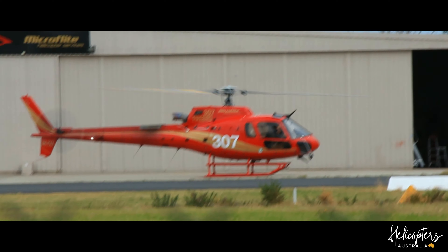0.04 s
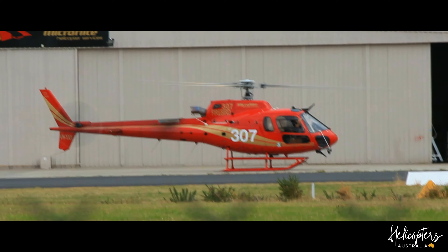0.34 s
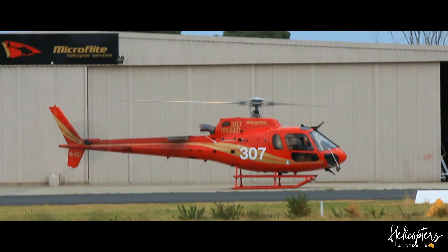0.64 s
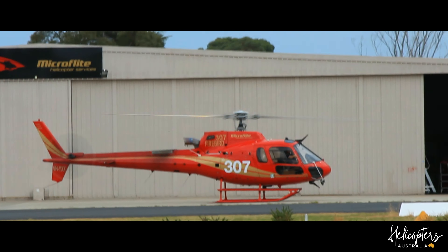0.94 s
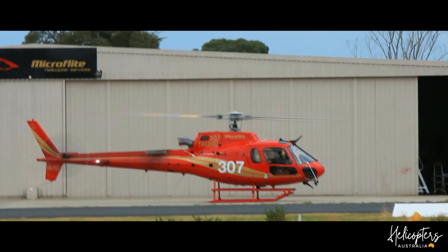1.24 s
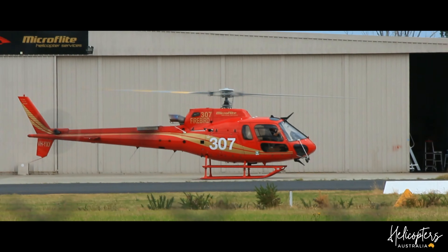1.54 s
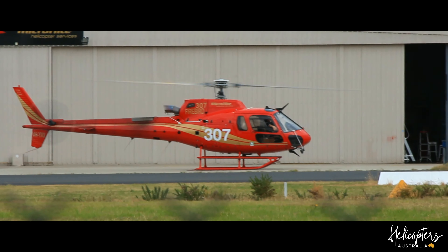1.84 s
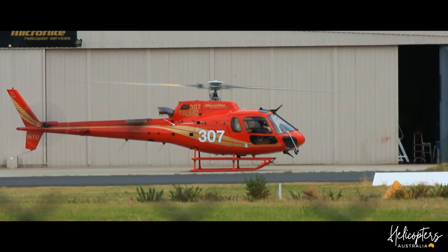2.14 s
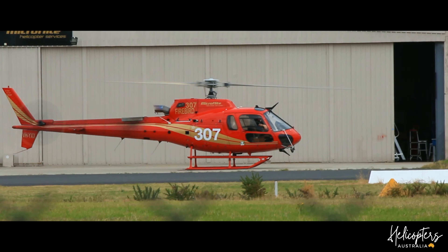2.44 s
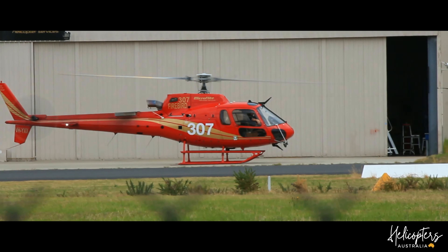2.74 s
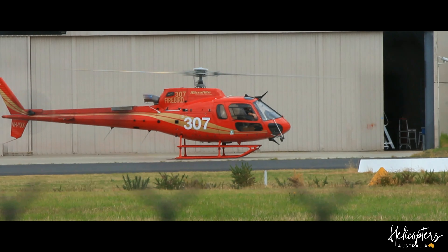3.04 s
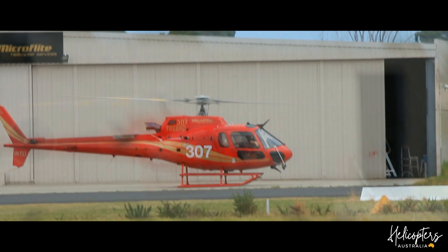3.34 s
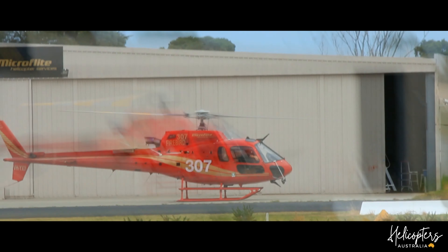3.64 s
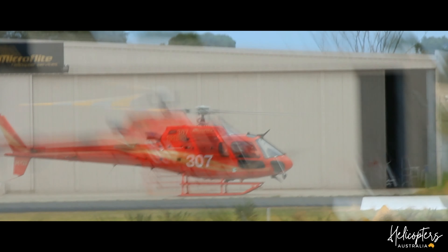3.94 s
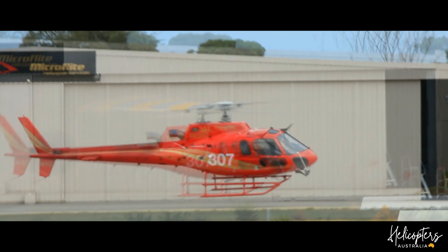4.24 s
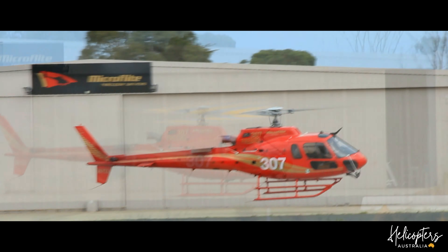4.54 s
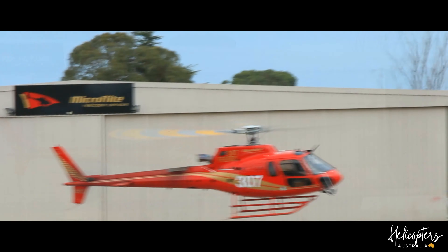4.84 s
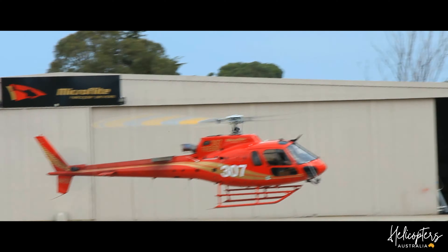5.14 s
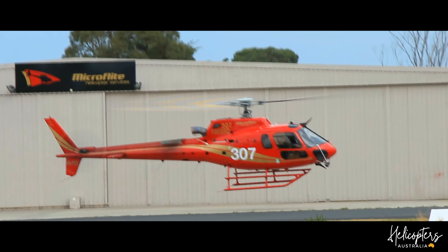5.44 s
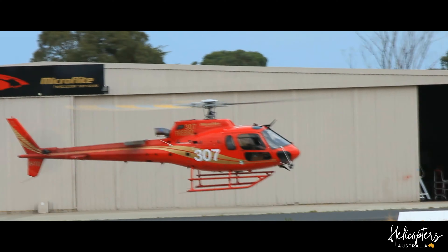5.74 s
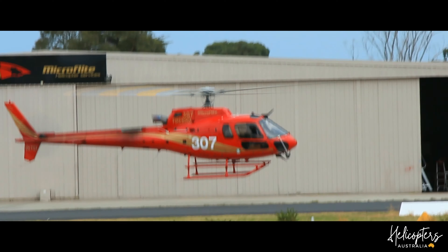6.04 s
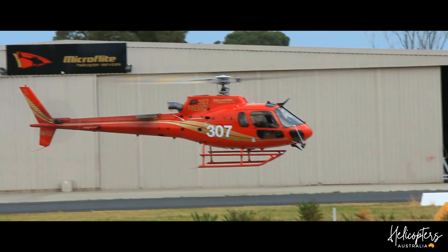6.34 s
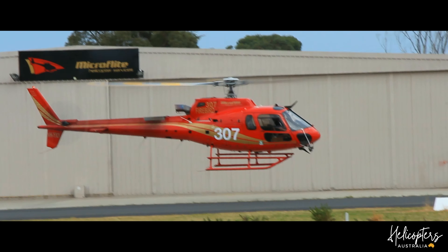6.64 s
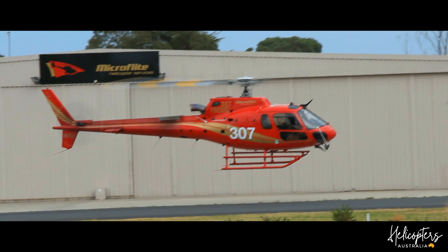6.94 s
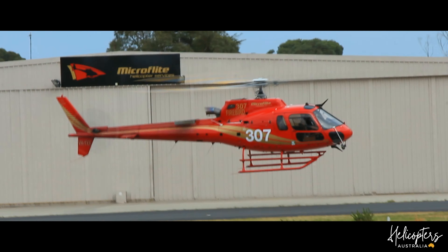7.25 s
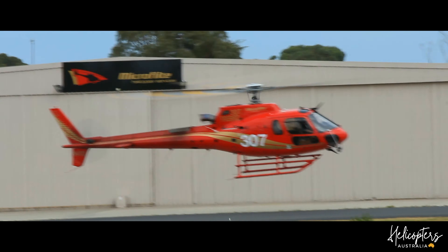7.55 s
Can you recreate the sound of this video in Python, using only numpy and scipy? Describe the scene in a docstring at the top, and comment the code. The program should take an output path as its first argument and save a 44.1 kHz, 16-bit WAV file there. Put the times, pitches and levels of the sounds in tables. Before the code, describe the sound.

Gusty wind rumbles and crackles on the microphone over a hovering helicopter's exhaust roar, turbine whine and, later, fast chopping rotor blades.

```python
"""An airfield apron in gusty wind, with a light turbine helicopter hovering over it.
Skimming the ground, it is all exhaust roar, tail-rotor hum and two climbing turbine whines;
hanging higher, it chops as each blade swishes by. Gusts buffet the microphone and overload it:
the strong ones push the recorder's gain down, so the steady roar sinks and swells back."""
import sys
import numpy as np
from scipy import signal
from scipy.fft import irfft, next_fast_len
from scipy.io import wavfile
from scipy.ndimage import uniform_filter1d, map_coordinates

SR = 44100
rng = np.random.default_rng(int(sys.argv[2]) if len(sys.argv) > 2 else 0)


def wav_record(signal):
    """Record a signal, one row per channel, as 16-bit PCM in the file named by sys.argv[1]."""
    frames = np.transpose(np.atleast_2d(signal))
    bounded = np.clip(frames, -1, 1)
    # unit amplitude maps onto the largest positive 16-bit level
    quanta = np.round(bounded * 32767).astype(np.int16)
    wavfile.write(sys.argv[1], SR, quanta)


N = 340011
TIME = np.arange(N) / SR


def from_db(db):
    """Decibels to gain."""
    return np.exp(np.asarray(db) * (np.log(10) / 20))


def rms_one(x):
    """Scale to rms 1."""
    return x / np.sqrt(np.mean(x ** 2) + 1e-20)


def curves(rows):
    """Breakpoints (t/s, values...) to one automation curve per value column."""
    times, *columns = np.transpose(rows)
    return [np.interp(TIME, times, column) for column in columns]


def noise(spectrum):
    """Noise coloured by an EQ curve (f/Hz, level/dB), rms 1."""
    hz, level_db = np.transpose(spectrum)
    size = next_fast_len(N, True)
    bin_hz = np.maximum(np.arange(size // 2 + 1) * SR / size, 1)
    gain = from_db(np.interp(np.log(bin_hz), np.log(hz), level_db)) * np.minimum(bin_hz / 20, 1)
    white = rng.standard_normal(2 * len(bin_hz)).view(complex)
    return rms_one(irfft(white * gain, size)[:N])


def drift(per_s):
    """Smooth random modulation, rms 1."""
    coarse = np.linspace(0, N / SR, N // 20)
    wander = map_coordinates(rng.standard_normal(4096), [coarse * per_s], order=2, mode="wrap")
    return rms_one(np.interp(TIME, coarse, wander))


def evened(x, span_s):
    """Hold the short-term level at 1, so that a brief burst gets its full punch."""
    size = max(int(span_s * SR), 2)
    return x / np.sqrt(uniform_filter1d(uniform_filter1d(x ** 2, size), size) + 1e-9)


def bursts(times, levels_db, lengths_s):
    """Envelope of bell-shaped bursts; a length is the width at half power."""
    power = np.zeros(N)
    for t, level_db, length in np.broadcast(times, levels_db, lengths_s):
        near = slice(max(int((t - 2 * length) * SR), 0), max(int((t + 2 * length) * SR), 0))
        power[near] += from_db(level_db) ** 2 * .5 ** ((2 * (TIME[near] - t) / length) ** 2)
    return np.sqrt(power)


def snaps(times, levels_db, lengths_s, spectrum, span_s=0.0019):
    """One short hit of coloured noise per cue."""
    return bursts(times, levels_db, lengths_s) * evened(noise(spectrum), span_s)


def tone(hz, waver_hz, flutter_db, per_s):
    """A sine whose pitch and level waver in the turbulent air, rms 1."""
    phase = 2 * np.pi * np.cumsum(hz + waver_hz * drift(per_s)) / SR
    return rms_one(np.sin(phase) * from_db(flutter_db * drift(per_s / 2)))


def reflected(x, lag_s, gain):
    """A nearby surface returns a weak copy: a light comb filter."""
    return x + gain * np.interp(TIME - lag_s, TIME, x, left=0)


def lagged(x, lag_s):
    """Follow x with the given time constant."""
    pole = np.exp(-1 / (lag_s * SR))
    return signal.lfilter([1 - pole], [1, -pole], x)


def scattered(wind_db, per_s, above_db, spread_db, candidates=400):
    """Times and levels of random hits that ride the wind's level."""
    when, lottery, weakness = rng.random((candidates, 3)).T
    times = when * N / SR
    levels_db = np.interp(times, TIME, wind_db) + above_db - spread_db * weakness
    chosen = lottery < per_s * N / SR / candidates
    return times[chosen], levels_db[chosen]


def kicks(times, levels_db, band_hz, top_hz):
    """An eddy's core is one rounded suction pulse, which the microphone's bass cut makes swing."""
    clicks = np.full(N, 1e-18)
    clicks[np.clip((times * SR).astype(int), 0, N - 1)] = -from_db(levels_db)
    band = signal.butter(2, band_hz, "band", fs=SR, output="sos")
    response = np.vstack([band, signal.butter(2, top_hz, fs=SR, output="sos")])
    peak = signal.sosfilt(response, signal.unit_impulse(1024)).max()
    return signal.sosfilt(response, clicks) / peak


# the bed of breeze: t/s, level/dB
BREEZE = [(0, -23.5), (2.7, -35), (3.2, -18.5), (4.0, -21.5), (4.5, -13.5), (5.3, -18), (5.7, -39),
          (7.71, -23)]
# gust swells: t/s, level/dB, length/s
GUSTS = [(0.092, -14.5, 0.056), (0.333, -12.5, 0.044), (0.467, -12.5, 0.079), (0.92, -5.5, 0.056),
         (1.384, -11.5, 0.17), (1.852, -19.5, 0.055), (2.07, -12, 0.055), (2.88, -16.5, 0.12),
         (3.04, -5, 0.054), (3.28, -10, 0.092), (3.512, -8, 0.089), (3.79, 1.5, 0.036), (4.08, -6, 0.12),
         (4.393, -13.5, 0.12), (4.682, -10, 0.2), (4.837, -4, 0.041), (5.057, -7, 0.032),
         (5.176, -8.5, 0.069), (6.273, -18.5, 0.11), (6.593, -16.5, 0.24), (7.041, -17.5, 0.021),
         (7.451, -10.5, 0.085), (7.61, -16.5, 0.03)]

def wind_level():
    """Gusts swell on top of the breeze; dB at every sample."""
    breeze = from_db(curves(BREEZE)[0])
    gusts = bursts(*np.transpose(GUSTS))
    return 10 * np.log10(breeze ** 2 + gusts ** 2)


# EQ of the wind's low end: f/Hz, level/dB
RUMBLE_EQ = [(20, -22), (50, -12.5), (110, -2), (220, -4), (400, -5), (700, -10), (1200, -19.5),
             (2500, -34), (5000, -81), (12000, -73.5)]

def wind_rumble(wind_db, lump_db=9.0):
    """Air tumbling over the microphone makes a lumpy rumble."""
    lumps = noise(RUMBLE_EQ) * from_db(lump_db * np.tanh(drift(170)))
    return from_db(wind_db + 1.5) * rms_one(evened(lumps, span_s=0.042))


# the hardest eddies: t/s, level/dB, length/s
BUFFETS = [(0.059, -5, 0.01), (0.106, -4, 0.0045), (0.251, -4.5, 0.0033), (0.41, 0.5, 0.0016),
           (0.662, -6, 0.0098), (0.763, -8, 0.0081), (0.906, -2, 0.0042), (0.925, 2.5, 0.01),
           (1.245, -5.5, 0.01), (1.345, -6.5, 0.008), (1.448, 2.5, 0.0037), (1.597, -8.5, 0.0074),
           (1.79, -6, 0.0037), (2.041, -6, 0.0028), (2.05, -3.5, 0.0043), (2.862, -5, 0.0035),
           (2.879, -6.5, 0.0066), (3.017, -3, 0.0094), (3.035, 0.5, 0.0081), (3.267, -4.5, 0.0062),
           (3.308, -1, 0.014), (3.418, -0.5, 0.005), (3.505, -1, 0.0023), (3.607, -2.5, 0.0042),
           (3.748, -1, 0.0043), (4.3, -5.5, 0.0054), (4.535, 3.5, 0.0025), (4.675, 0, 0.0039),
           (4.842, -14, 0.038), (5.138, -2.5, 0.0056), (6.231, -9.5, 0.0052), (6.521, -9.5, 0.0043),
           (6.711, -5, 0.0024), (7.408, -5.5, 0.0044), (7.427, -6, 0.012)]
# EQ of their dull thud: f/Hz, level/dB
THUD_EQ = [(20, -9.5), (60, -27), (140, -1), (280, 5.5), (480, -4), (800, -13), (1400, -31), (2800, -41),
           (5000, -50.5), (12000, -72)]

def wind_eddies(wind_db):
    """Eddies kick the microphone at random; the hardest layer a thud over the kick."""
    times, levels_db = scattered(wind_db, per_s=18, above_db=10.5, spread_db=5)
    eddies = kicks(times, levels_db, band_hz=(130, 587), top_hz=1800)
    times, levels_db, lengths_s = np.transpose(BUFFETS)
    thuds = snaps(times, levels_db, lengths_s, THUD_EQ, span_s=0.0016)
    cores = kicks(times, levels_db + 3.5, band_hz=(162, 710), top_hz=2620)
    return eddies + thuds + cores


# loud wind cracks, before their trims: t/s, crack level/dB, spit level/dB
CRACKS = [(0.4078, -17, -48), (0.9233, -20, -16), (2.0498, -21, -23), (3.017, -26, -26), (3.419, -14, -53),
          (3.5056, -15, -27.5), (3.7518, -8.5, -37), (3.7831, -1, -16), (4.0974, -4, -42),
          (4.8185, -5, -35), (4.8313, 0, -15), (4.8496, -2, -40), (5.1887, -2.5, -53), (7.4295, -4.5, -18)]
# EQs of the midrange crackle and the bright spit: f/Hz, level/dB
CRACKLE_EQ = [(200, -26.5), (700, 15), (1500, 15), (2500, 7), (4000, -11), (7000, -39), (11000, -54)]
SPIT_EQ = [(1500, 0), (4000, 10), (8000, -12), (11000, -11), (15500, -18)]

def wind_crackle(wind_db):
    """Wind ticks and cracks on the microphone; the hardest hits spit on top."""
    times, tick_db = scattered(wind_db, per_s=34, above_db=2.5, spread_db=4.0)
    ticks = snaps(times, tick_db, lengths_s=0.0013, spectrum=CRACKLE_EQ)
    times, crack_db, spit_db = np.transpose(CRACKS)
    cracks = snaps(times, crack_db + 5.0, lengths_s=0.00098, spectrum=CRACKLE_EQ)
    spits = snaps(times, spit_db - 1.0, lengths_s=0.0007, spectrum=SPIT_EQ)
    return ticks + cracks + spits


# first-stage whine: t/s, f/Hz, level/dB against the roar
TURBINE = [(0, 7500, -26), (0.6, 7470, -27), (0.95, 7500, -29), (1.4, 7500, -31), (1.85, 7680, -26.5),
           (2.25, 7680, -28), (2.8, 7740, -31), (3.4, 7830, -31)]

def turbine_whine():
    """Two turbine stages sing, climbing together a fixed interval apart."""
    hz, level_db = curves(TURBINE)
    first = tone(hz, waver_hz=13, flutter_db=2.5, per_s=70)
    second = tone(hz * 1.1835, waver_hz=16, flutter_db=2.5, per_s=70)
    return from_db(level_db) * (first + from_db(-3.0) * second)


# compressor pitch: t/s, f/Hz
COMPRESSOR = [(4.0, 10500), (5.1, 10360), (6.3, 10630), (7.3, 10440), (7.71, 10330)]

def compressor_whistle():
    """The spinning compressor adds a faint, fluttering whistle."""
    return from_db(-37.5) * tone(curves(COMPRESSOR)[0], waver_hz=52, flutter_db=3.0, per_s=180)


# gear tones: f/Hz, level/dB against the roar
GEARS = [(2530, -11.5), (2700, -13.5), (6800, -30)]

def gearbox():
    """Meshing gears ring as three wavering tones."""
    return sum(from_db(db) * tone(hz, waver_hz=hz / 120, flutter_db=-1.0, per_s=170) for hz, db in GEARS)


# fader of the thin whistle: t/s, level/dB against the roar
THIN_WHISTLE = [(0, -24), (.9, -29), (1.5, -35), (2.0, -29), (2.7, -41), (3.3, -27), (4.2, -37),
                (7.71, -36)]

def thin_whistle(hz=15690):
    """A thread of steady pitch at the very top."""
    return from_db(curves(THIN_WHISTLE)[0]) * tone(hz, waver_hz=3, flutter_db=0.5, per_s=16)


# EQ of the tail rotor's harmonics: f/Hz, level/dB
BUZZ_EQ = [(90, -1), (180, -11), (270, -9.5), (450, -24), (850, -16), (1200, -21), (1600, -13.5),
           (2600, -23)]

def tail_rotor(height, blade_hz=90.2, harmonics=28, low_hover_db=-1, high_hover_db=-17):
    """A buzzing hum at the tail rotor's blade rate, falling back as the helicopter rises."""
    phase = 2 * np.pi * np.cumsum(blade_hz + .25 * drift(6)) / SR
    orders = np.arange(1, harmonics + 1)
    hz, level_db = np.transpose(BUZZ_EQ)
    gains = from_db(np.interp(np.log(orders * blade_hz), np.log(hz), level_db))
    offsets = rng.uniform(0, 2 * np.pi, harmonics)
    buzz = sum(gain * np.sin(k * phase + offset) for k, gain, offset in zip(orders, gains, offsets))
    return from_db(low_hover_db + (high_hover_db - low_hover_db) * height) * np.sqrt(2) * buzz


# EQs of the low-hover roar, the high-hover roar and the jet hiss: f/Hz, level/dB
LOW_HOVER_EQ = [(25, -9), (70, 0.5), (200, -3), (400, -2.5), (560, -4), (900, 2), (1400, -4.5), (2300, -8),
                (3200, -17.5), (4300, -22), (6500, -35.5), (9000, -35.5), (9900, -50.5), (15000, -66.5)]
HIGH_HOVER_EQ = [(25, -11), (100, -11), (280, 3), (450, -1), (750, 3.5), (1300, -4), (2100, -8),
                 (2700, -19), (3300, -15.5), (5000, -24), (7500, -38), (8900, -35), (9900, -49.5),
                 (15000, -67)]
HISS_EQ = [(2000, -15), (4500, 14.5), (8500, 12.5), (10000, -5.5), (12500, -3.5), (15500, -1)]
# fader of the jet hiss: t/s, level/dB against the roar
HISS = [(0, -21), (1.3, -33), (2.0, -29), (2.7, -25.5), (3.2, -24), (3.8, -46.5), (5.0, -49), (5.7, -27.5),
        (6.6, -23), (7.71, -37)]

def exhaust(height, churn_db=1.0):
    """Turbulent roar and its reflection, crossfading in colour with height, with jet hiss on top."""
    low = from_db(7.5) * reflected(noise(LOW_HOVER_EQ), lag_s=0.00107, gain=0.032)
    high = from_db(8.0) * reflected(noise(HIGH_HOVER_EQ), lag_s=0.002027, gain=-0.11)
    roar = np.sqrt(1 - height) * low + np.sqrt(height) * high
    hiss = from_db(curves(HISS)[0]) * noise(HISS_EQ)
    return (roar + hiss) * from_db(churn_db * drift(110))


# fader of the chop: t/s, level/dB
CHOP = [(3.9, -26), (4.1, -13), (4.5, -23), (5.3, -20), (5.8, -13), (6.3, -12), (7.3, -15), (7.71, -15.5)]
# EQ of a blade cutting the air: f/Hz, level/dB
BLADE_EQ = [(100, -2.5), (400, -5), (750, 6), (1400, 3), (2150, -8.5), (2750, -7.5), (3600, -17.5),
            (5000, -26.5), (7000, -38), (9000, -48), (11000, -57), (15000, -74)]

def blade_chop(period_s=0.05122, sync_s=5.793, crest_s=0.0032):
    """Each advancing blade throws a sharp swish, set in a softer wake and followed by a reflection."""
    passes = np.arange(sync_s % period_s, N / SR, period_s)
    passes = passes[passes > CHOP[0][0]]
    jitter_db = rng.standard_normal((len(passes), 2))
    level_db = np.interp(passes, *np.transpose(CHOP))
    crest = bursts(passes, level_db + jitter_db[:, 0], crest_s)
    wake = bursts(passes + 0.0032, level_db - 9, lengths_s=0.025)
    echo = bursts(passes + 0.013, level_db - 7 + 2 * jitter_db[:, 1], crest_s)
    return np.sqrt(crest ** 2 + wake ** 2 + echo ** 2) * evened(noise(BLADE_EQ), span_s=0.0027)


# hard accents in the chop: t/s, level/dB
SLAPS = [(5.1339, -8.5), (5.7935, -11), (6.0475, -13.5), (6.2042, -11), (6.2543, -8.5), (6.3058, -9.5),
         (6.4088, -10.5), (6.5107, -11), (6.8726, -9), (6.9711, -10), (7.0225, -16), (7.1233, -12),
         (7.2239, -13), (7.2398, -16)]

def blade_slaps():
    """A blade slaps where it cuts the vortex of the one before."""
    return snaps(*np.transpose(SLAPS), lengths_s=0.0031, spectrum=BLADE_EQ)


# the hover: t/s, height (0 = skimming, 1 = high)
HEIGHT = [(0, 0.0038), (3.1, 0.037), (4.6, 1), (7.71, 0.73)]
# group fader of the roar, engine tones and tail rotor: t/s, level/dB
ROAR = [(0, -30), (0.35, -31.5), (0.85, -21), (1.6, -24.5), (2.3, -25), (2.8, -25), (4.2, -29), (5.6, -27),
        (6.0, -33), (6.4, -33), (7.0, -33), (7.71, -34.5)]

def helicopter():
    """Roar and hum under the blades; with height, turbine whine gives way to compressor and gears."""
    height = np.clip(curves(HEIGHT)[0], 0, 1)
    roar = exhaust(height)
    engine = (1 - height) * turbine_whine() + height ** 2 * (compressor_whistle() + gearbox())
    drone = from_db(curves(ROAR)[0]) * (roar + engine + thin_whistle() + tail_rotor(height))
    blades = from_db(3.0) * blade_chop() + from_db(2.5) * blade_slaps()
    return drone + reflected(blades, lag_s=0.00197, gain=-0.084)


def scene():
    """The helicopter and the wind, mixed in mono."""
    wind_db = wind_level()
    return (helicopter() + wind_rumble(wind_db) + wind_eddies(wind_db) + wind_crackle(wind_db))[None]


def gain_control(x, threshold_db=-14.5, sense_s=0.013, attack_s=0.011, release_db_per_s=35):
    """Anything over the threshold ducks the gain quickly; it climbs back at a steady rate."""
    level_db = 10 * np.log10(lagged(x ** 2, sense_s) + 1e-12)
    excess_db = np.maximum(level_db - threshold_db, 0)
    climb_db = release_db_per_s * TIME
    duck_db = np.maximum.accumulate(excess_db + climb_db, axis=-1) - climb_db
    return x * from_db(-lagged(lagged(duck_db, attack_s), attack_s))


# the whole mix sinks and returns between the low and the high hover: t/s, level/dB
DIP = [(3.0, -0.5), (4.1, -7.5), (4.8, -1)]

def record(dry, low_cut_hz=30, high_cut_hz=15900):
    """Low cut, gain riding the gusts, a dip in level, soft clipping at full scale, steep high cut."""
    lean = signal.sosfilt(signal.butter(2, low_cut_hz, "high", fs=SR, output="sos"), dry)
    ridden = gain_control(lean) * from_db(curves(DIP)[0])
    clipped = ridden / (1 + ridden ** 16) ** (1 / 16)
    return signal.sosfilt(signal.ellip(12, .1, 90, high_cut_hz, fs=SR, output="sos"), clipped)


dry = scene()
out = record(dry)
wav_record(out)
```